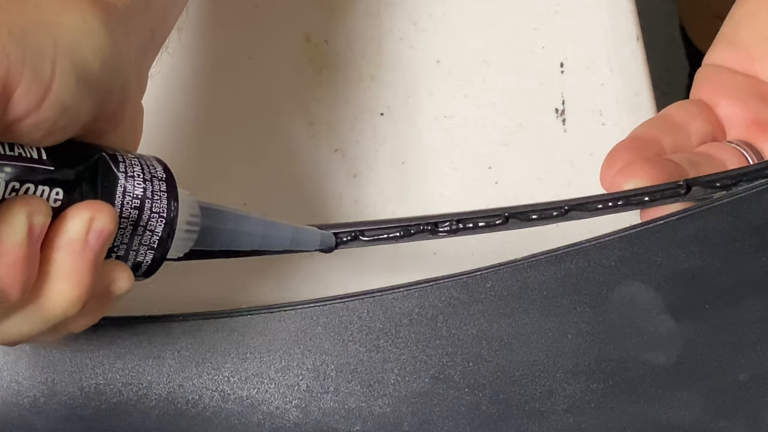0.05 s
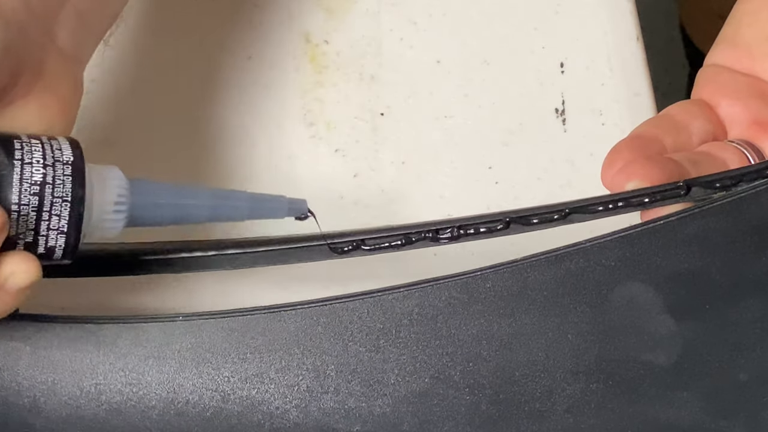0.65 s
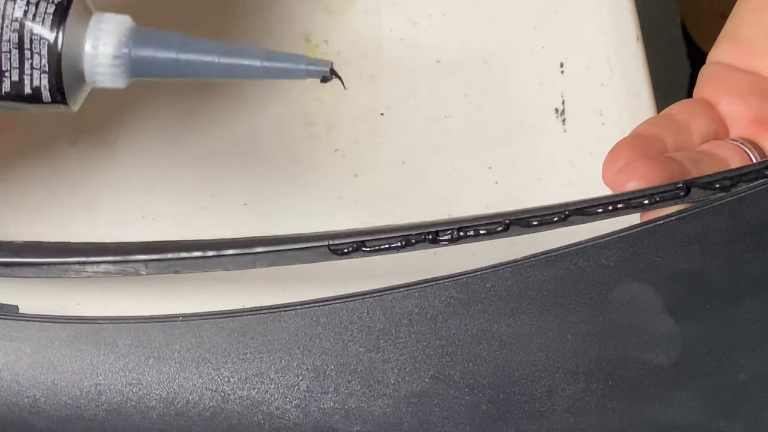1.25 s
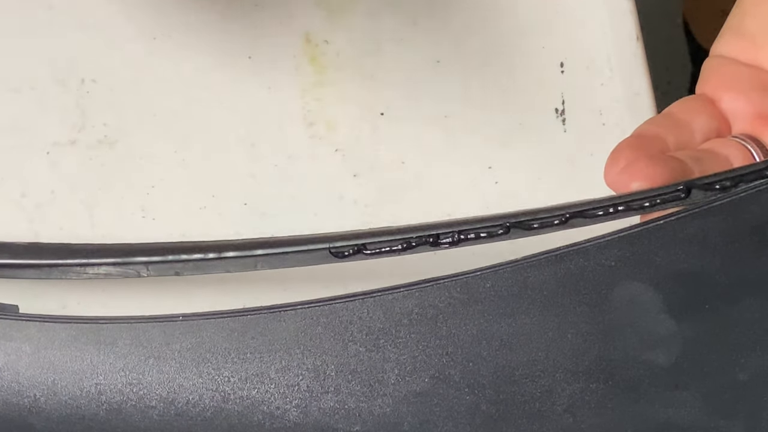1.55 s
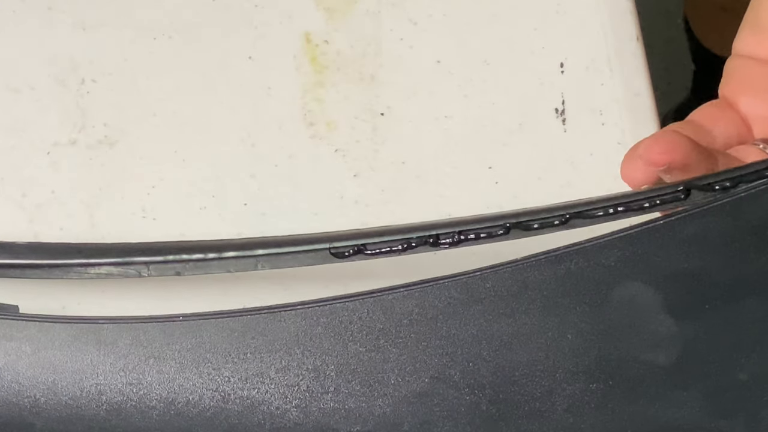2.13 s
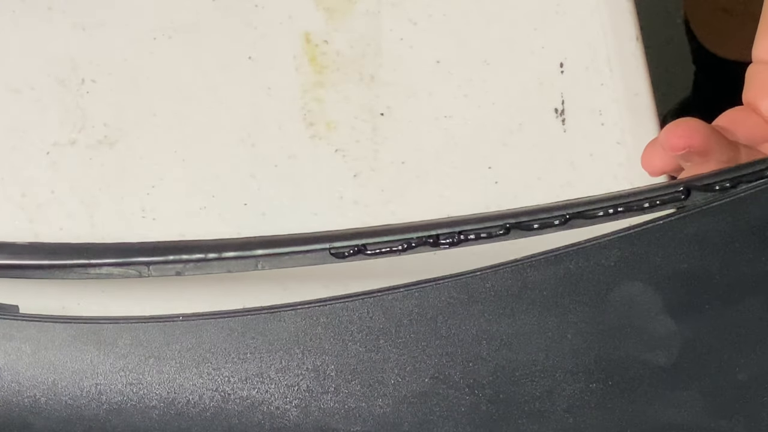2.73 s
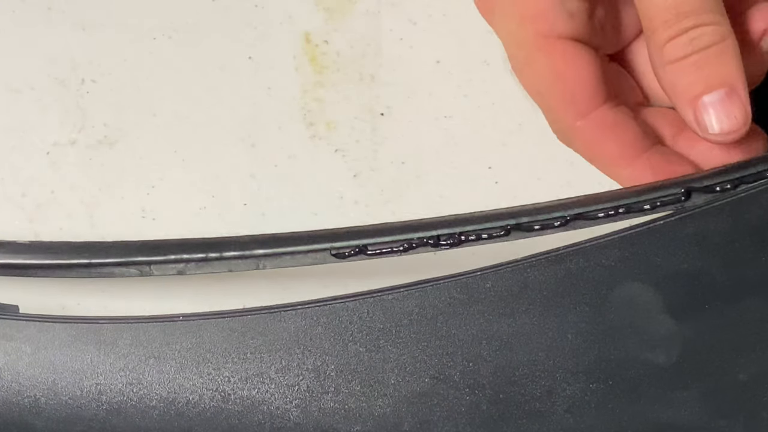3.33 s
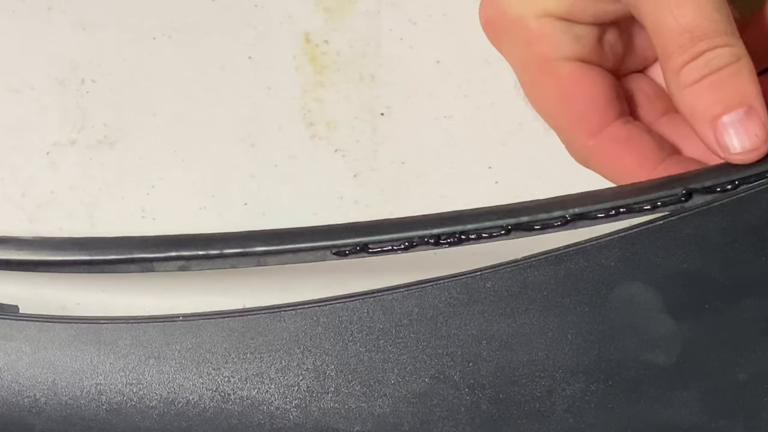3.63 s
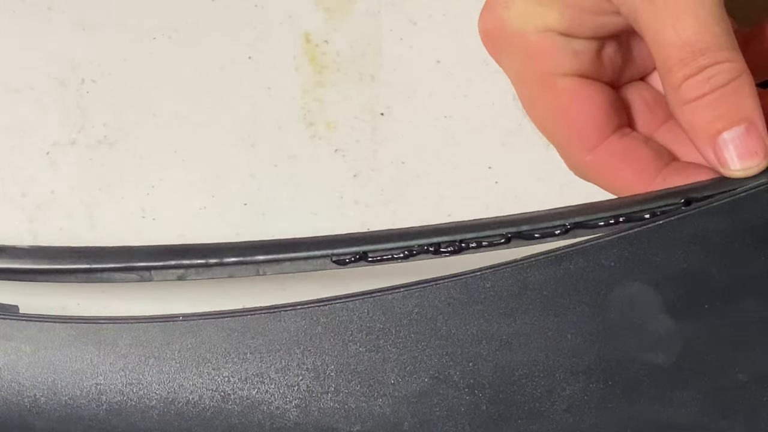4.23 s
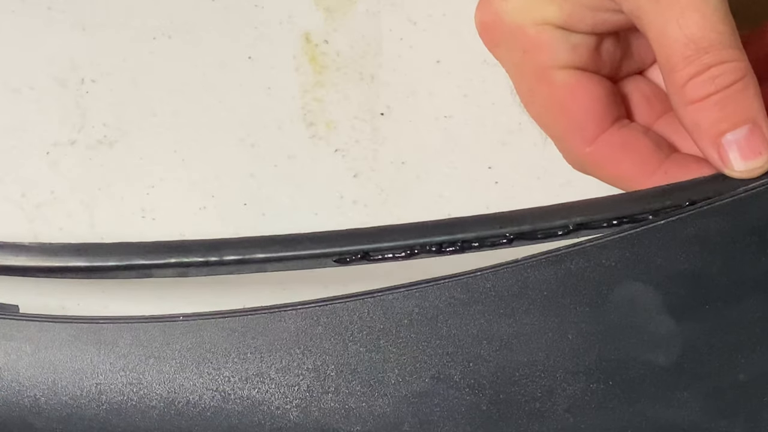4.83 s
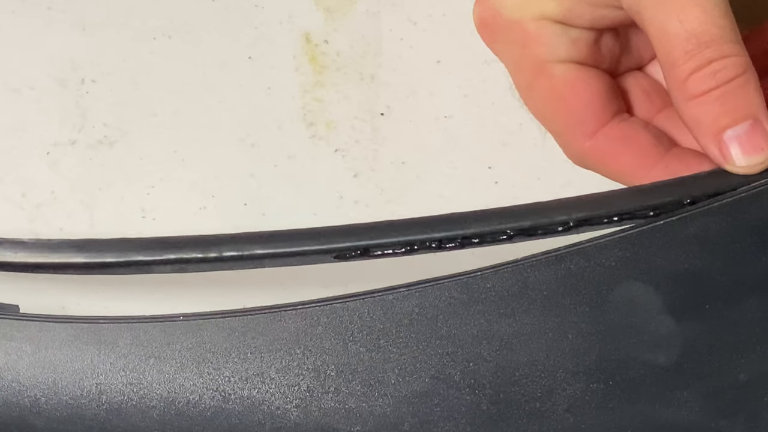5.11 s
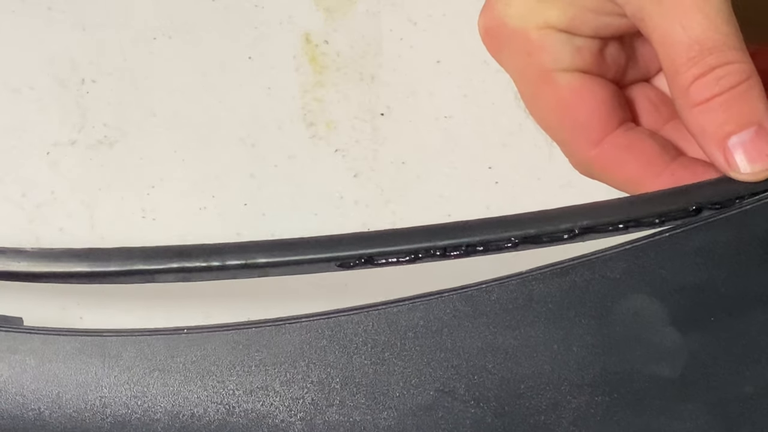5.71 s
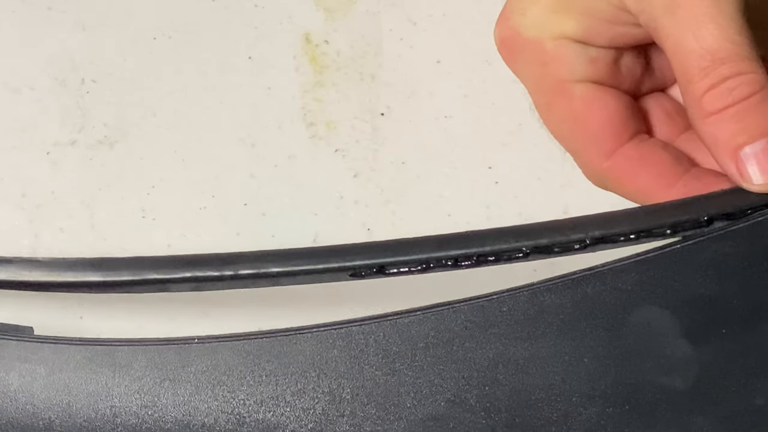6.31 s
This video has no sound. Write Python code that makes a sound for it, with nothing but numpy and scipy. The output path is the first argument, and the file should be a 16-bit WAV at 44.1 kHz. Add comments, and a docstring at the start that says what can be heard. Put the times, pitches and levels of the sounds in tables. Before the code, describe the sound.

Sharp knocks of a tube set down on a plastic table, later a short scrape and thud, with a motor humming quietly.

```python
"""A garage with a plastic work table. A tube of sealant is put down: it knocks the top into ringing,
rolls a little with its nozzle tapping and its foil skin crinkling, and drops flat. Later a plastic
trim panel scrapes over the table in tiny slips and lands with a thud. Hands brush softly over plastic.
Behind the short echo of the walls, a motor hums low and unevenly in a soft rush of air."""
import sys
import numpy as np
from scipy import signal
from scipy.fft import rfft, irfft, next_fast_len
from scipy.io import wavfile
from scipy.ndimage import uniform_filter1d

SR = 44100
rng = np.random.default_rng(int(sys.argv[2]) if len(sys.argv) > 2 else 0)


def transcribe(u):
    """Save the signal u as a 16-bit wav file named by the first command-line argument.

    u: samples, shape (n,) or (channels, n), limited to [-1, 1]; the rate is SR.
    q: integer samples, one column per channel.
    """
    v = np.clip(np.atleast_2d(u).T, -1, 1)
    q = np.round(v * 32767).astype(np.int16)
    wavfile.write(sys.argv[1], SR, q)


N = 285085
TIME = np.arange(N) / SR

# the tube rocking from crease to crease: (time [s], length [s], rumble [dB], rubbing [dB])
TUBE_ROCKS = [(2.2, 0.022, -51, -50), (2.242, 0.039, -59, -44.5), (2.314, 0.083, -40.5, -54.5),
              (2.443, 0.015, -42, -61.5)]


def tube_knocks(travel_s=.003):
    """Each blow rings the table top; where it lands weights the modes, a soft contact dulls them."""
    # (time [s], strength [dB], spot [0 middle to 1 edge], contact cut-off [Hz], clatter [dB])
    blows = [(2.1493, 0, 0.11, 6700, -29), (2.5411, -21, 0.89, 2980, -35.5), (2.5487, -3, 0.93, 2940, -30),
             (2.7700, -32.5, 0.74, 810, -47.5)]
    # table top: (pitch [Hz], t60 [s], struck in the middle [dB], struck at the edge [dB])
    table_modes = [(100, 0.073, -28, -30.5), (137.5, .13, -28, -16), (162.4, 0.15, -17.5, -31.5),
                   (249.7, 0.22, -30.5, -31), (291.1, 0.16, -46.5, -39.5), (334.7, 0.14, -26.5, -45),
                   (374, 0.14, -32.5, -25.5), (445, 0.16, -39.5, -43.5), (476, 0.057, -53.5, -40),
                   (517, 0.19, -28.5, -47), (561, 0.3, -51, -35), (628, 0.04956, -49.5, -15.5),
                   (718, .06, -36, -42), (850, 0.13, -37, -45.5), (943.4, 0.059, -44.5, -33),
                   (1222, 0.31, -45, -59), (1345, .06, -40.5, -39.5), (1531, 0.086, -38, -42.5),
                   (1712.6, 0.18, -37, -63.5), (1884, 0.16, -34.5, -58.5), (2080, .08, -32.5, -57.5),
                   (2240, .11, -42, -47), (2520, 0.15, -42, -48), (2591, .07, -42.5, -44),
                   (2754, .07, -38.5, -50), (2785, 0.0501, -36.5, -51.5)]
    hz, t60, middle_db, edge_db = np.transpose(table_modes)
    out = np.zeros(N)
    for s, strength_db, spot, contact_hz, clatter_db in blows:
        level_db = strength_db + middle_db + spot * (edge_db - middle_db)
        blow = ringing(np.c_[hz, t60, level_db], travel_s) + from_db(clatter_db) * clatter()
        add(out, s, butter(blow, contact_hz, "low"))
    return out


def panel_bumps(travel_s=0.0019, clatter_db=-38):
    """The large limp panel lands with a dull, broad thud."""
    # landings: (time [s], strength [dB], contact cut-off [Hz])
    bumps = [(5.6590, -18.5, 800), (6.0200, 0.5, 2210)]
    # trim panel: (pitch [Hz], t60 [s], level [dB])
    panel_modes = [(88.2, 0.15, -33), (120, 0.071, -49.5), (154.4, 0.33, -35.5), (216.3, 0.19, -38.5),
                   (293, 0.15, -39), (344, 0.13, -42), (435, 0.055, -37.5), (522, 0.23, -46.5),
                   (654, 0.042, -36), (862, 0.039, -41), (1266, 0.04, -42.5), (1410, 0.025, -53)]
    out = np.zeros(N)
    for s, strength_db, contact_hz in bumps:
        thud = ringing(panel_modes, travel_s) + from_db(clatter_db) * clatter()
        add(out, s, from_db(strength_db) * butter(thud, contact_hz, "low"))
    return out


def ringing(modes, travel_s, build_cycles=0.52):
    """A struck sheet: bending waves carry low notes more slowly, and these take longer to build."""
    hz, t60, level_db = np.transpose(modes)[:, :, None]
    age = np.maximum(TIME[:SR // 2] - travel_s * np.sqrt(hz[0] / hz), 0)
    build = 1 - np.exp(-age * hz / build_cycles)
    swing = np.sin(2 * np.pi * hz * age) * build * from_db(level_db - 60 * age / t60)
    return swing[::2].sum(axis=0) - swing[1::2].sum(axis=0)   # modes alternate in polarity


def clatter():
    """The crowd of weak, short-lived modes that every blow stirs."""
    # tone of the burst: (frequency [Hz], level [dB])
    spectrum = [(70, -9), (130, 8.5), (400, 11), (750, 1), (1100, -1), (2000, -5.5), (3000, -12.5),
                (3900, -13), (5500, -13), (8000, -17.5), (15000, -17.5)]
    # its decay: (frequency [Hz], t60 [s])
    decay = [(100, .13), (700, 0.12), (3000, 0.13), (12000, .07)]
    return die_away(rms_one(colour(rng.standard_normal(SR // 2), spectrum)), decay)


def nozzle_taps(snap_db=-43):
    """The tube's hard nozzle taps the table, with the same resonance each time."""
    # (time [s], level [dB])
    taps = [(2.1494, -24), (2.2465, -35), (2.2660, -41.5), (2.2782, -30), (2.323, -41.5), (2.3395, -39.5),
            (2.549, -35)]
    out = np.zeros(N)
    for s, db in taps:
        add(out, s, click(db, db + snap_db, hz=2597, t60=.013, spread=1.18, snap_hz=5500))
    return out


def rolling_tube(attack_s=0.015):
    """The creased tube drums softly on the table as it rolls, and its skin rubs."""
    # drumming resonances: (pitch [Hz], bandwidth [Hz], level [dB])
    roll_modes = [(222.8, 30, 0), (260, 18, -6), (339, 40, -12), (422, 54, -15)]
    # tone of the rubbing: (frequency [Hz], level [dB])
    rub_spectrum = [(200, -12), (550, 2.5), (850, 0.5), (1250, 5.5), (1700, 2), (2300, 0), (3300, -10),
                    (4500, -12.5), (8000, -29), (15000, -51)]
    s, length_s, rumble_db, rubbing_db = np.transpose(TUBE_ROCKS)
    rumble = strokes(zip(s, length_s, rumble_db), attack_s, t60=0.17)
    rubbing = strokes(zip(s, length_s, rubbing_db), attack_s, t60=0.1)
    jolts = slips(per_s=600, spread_db=3.5)
    drum = sum(from_db(db) * signal.lfilter(*signal.iirpeak(hz, hz / width, fs=SR), jolts)
               for hz, width, db in roll_modes)
    rub = colour(slips(per_s=3400, spread_db=8.0), rub_spectrum)
    return rumble * steadied(butter(drum, [190, 520], "band")) + rubbing * steadied(rub)


def foil_crinkle(below_rumble_db=38.5):
    """The tube's creased foil crackles finely as it settles, and faintly while it rocks."""
    # after each landing: (time [s], length [s], level [dB])
    settling = [(2.15, 0.087, -62), (2.538, 0.038, -62.5)]
    # tone of the foil: (frequency [Hz], level [dB])
    spectrum = [(2000, -25), (3500, -5), (4800, -5), (7000, -5.5), (10000, -15), (14000, -24.5)]
    rocking = [(s, length_s, rumble_db - below_rumble_db) for s, length_s, rumble_db, _ in TUBE_ROCKS]
    flexing = strokes(settling + rocking, attack_s=0.014, t60=0.22)
    return flexing * steadied(colour(slips(per_s=6000, spread_db=3.0), spectrum))


def sliding_panel(start_s=5.904, peak_s=5.976, end_s=6.02, peak_db=-47):
    """One shove: the panel's edge sticks and slips, swelling to the hardest push, then easing off."""
    # tone of the scrape: (frequency [Hz], level [dB])
    spectrum = [(90, 10.5), (160, 5), (350, 9), (600, 0.5), (1000, -1.5), (2100, -2), (4000, -16),
                (7000, -25.5), (10500, -26), (15000, -46)]
    grow_db_per_s, ease_db_per_s = 141, 168
    past_peak = TIME - peak_s
    push_db = peak_db + np.minimum(grow_db_per_s * past_peak, -ease_db_per_s * past_peak)
    push = from_db(push_db) * stroke(start_s, end_s - start_s, attack_s=0.0066, t60=0.043)
    return push * steadied(colour(slips(per_s=2200, spread_db=4.0), spectrum))


def edge_ticks():
    """Edges of tube and trim catch and let go with light ticks."""
    # (time [s], body [dB], bright snap [dB])
    catches = [(2.537, -52, -64), (2.558, -59, -58), (2.579, -48.5, -66), (3.420, -97, -86),
               (3.501, -78.5, -66.5), (3.519, -87, -74), (5.9065, -68.5, -70.5), (5.928, -45, -55.5),
               (5.9500, -49, -79), (5.964, -47, -51), (5.974, -61, -49.5), (5.983, -53, -69),
               (6.021, -50.5, -65), (6.095, -70, -67.5)]
    out = np.zeros(N)
    for s, body_db, snap_db in catches:
        add(out, s, click(body_db, snap_db, hz=3280, t60=0.023, spread=1.43, snap_hz=6500))
    return out


def click(body_db, snap_db, hz, t60, spread, snap_hz, snap_t60=0.028):
    """A hard plastic touch: one broad, quickly damped resonance and a bright snap."""
    t = TIME[:SR // 8]
    body_noise, snap_noise = rng.standard_normal((2, len(t)))
    fade = from_db(body_db - 60 * t / t60)
    body = butter(body_noise * fade, [hz / spread, hz * spread], "band", order=3)
    snap = rms_one(butter(snap_noise, snap_hz, "high")) * from_db(snap_db - 60 * t / snap_t60)
    return rms_one(body) * np.sqrt(np.mean(fade ** 2)) + snap


def hands():
    """Skin brushes softly over tube and trim."""
    # (time [s], length [s], level [dB])
    brushes = [(.91, 0.076, -74), (1.22, 0.34, -82.5), (3.36, 0.23, -81), (3.7, 0.26, -79.5)]
    # tone of skin on plastic: (frequency [Hz], level [dB])
    spectrum = [(200, -15.5), (500, 7), (900, 3.5), (1500, -10.5), (2500, -16.5), (5000, -22), (14000, -34)]
    touch = strokes(brushes, attack_s=0.038, t60=.55)
    return touch * rms_one(colour(slips(per_s=6000, spread_db=2.0), spectrum))


def motor_hum(hum_hz=56.6, hum_db=-59.5, flutter_depth=.2, flutter_hz=11):
    """The motor's main tone throbs in slow beats and flutters, above two faint steady tones."""
    # overlapping throbs: (rate [Hz], depth [0-1], time of a swell [s])
    beats = [(1.79, .28, 3.35), (1.56, .26, 3.34), (2.25, .22, 2.83), (2.56, .17, 1.09)]
    # steady undertones: (pitch [Hz], level [dB])
    low_tones = [(47.3, -81), (29, -87)]
    throb = 1 + sum(depth * np.cos(2 * np.pi * rate * (TIME - s)) for rate, depth, s in beats)
    flutter = flutter_depth * rms_one(butter(rng.standard_normal(N), flutter_hz, "low"))
    main = from_db(hum_db) * (throb + flutter) * np.sin(2 * np.pi * (hum_hz * TIME + rng.random()))
    low = sum(from_db(db) * np.sin(2 * np.pi * (hz * TIME + rng.random())) for hz, db in low_tones)
    return np.sqrt(2) * (main + low)


def air(level_db=-61.5, low_cut_hz=46):
    """A steady bed of moving air."""
    # tone of the rush: (frequency [Hz], level [dB])
    spectrum = [(45, -14), (70, -6.5), (118, -5.5), (181, -13.5), (237, -16), (350, -22.5), (490, -26.5),
                (840, -29), (1450, -39.5), (3500, -53.5), (5800, -54.5), (7000, -50.5), (8400, -62.5),
                (10300, -56), (12500, -72.5), (15500, -69)]
    noise = colour(diffuse(next_fast_len(N, True))[:, :N], spectrum)
    return from_db(level_db) * rms_one(butter(noise, low_cut_hz, "high"))


def direct_sound(x, lean_db=0.87, treble_hz=8000, lag_samples=13):
    """The table's bass leans left; the top treble reaches the left side slightly late."""
    bass = butter(x, 700, "low", order=1)
    treble = colour(x, [(treble_hz / 2, -120), (treble_hz, 0)])
    leaning = x + bass * (from_db([[lean_db], [-lean_db]]) - 1)
    return leaning + (np.roll(treble, lag_samples) - treble) * [[1], [0]]


def side_echo(x, level_db=-5, band_hz=(850, 1500), lag_samples=110):
    """A close surface at one side returns the mids to left and right in opposite phase."""
    mids = butter(x, band_hz, "band", order=3)
    return from_db(level_db) * np.roll(mids, lag_samples) * [[1], [-1]]


def garage_echo(x, tail_db=-11, early_db=-11, early_t60=.09, build_s=0.0045):
    """Small near surfaces return the treble at once; the walls add a longer tail."""
    # tone of the tail: (frequency [Hz], level [dB])
    spectrum = [(100, -8), (250, 1), (600, -3), (1300, 1), (3000, 0), (7000, 0), (15000, -9)]
    # reverb time: (frequency [Hz], t60 [s])
    decay = [(100, 0.77), (500, 0.41), (2000, 0.51), (5000, 0.22), (14000, 0.22)]
    t = TIME[:SR * 3 // 4]
    tail = die_away(colour(diffuse(len(t)), spectrum), decay) * (1 - np.exp(-t / build_s))
    early = butter(diffuse(len(t)), 740, "high") * from_db(-60 * t / early_t60)
    response = (from_db(tail_db) * rms_one(tail) + from_db(early_db) * rms_one(early)) / np.sqrt(len(t))
    return signal.fftconvolve(x[None], response, axes=1)[:, :N]


def diffuse(size):
    """White stereo noise, nearly mono in the bass and wider above."""
    # stereo image: (frequency [Hz], left-right correlation [-1 to 1])
    likeness = [(60, 0.93), (130, 0.96), (300, 0.84), (700, .45), (1300, .3), (2500, 0.68), (4400, .85),
                (8000, 0.54), (14000, -.1)]
    alike = at_hz(likeness, np.fft.rfftfreq(size, 1 / SR))
    mid, side = rfft(rng.standard_normal((2, size)))
    return irfft(np.sqrt((1 + alike) / 2) * mid + np.sqrt((1 - alike) / 2) * side * [[1], [-1]], size)


def slips(per_s, spread_db):
    """Friction: tiny slips of uneven size at random moments."""
    sizes = from_db(spread_db * np.minimum(rng.exponential(1, N), 3)) * rng.choice([-1, 1], N)
    return sizes * (rng.random(N) < per_s / SR)


def stroke(start_s, length_s, attack_s, t60):
    """Envelope of one movement: it rises, holds and dies away."""
    age = TIME - start_s
    return np.clip(age / attack_s, 0, 1) * from_db(-60 * np.clip(age - length_s, 0, 3 * t60) / t60)


def strokes(rows, attack_s, t60):
    """Envelope of several movements: (time [s], length [s], level [dB])."""
    return sum(from_db(db) * stroke(s, length_s, attack_s, t60) for s, length_s, db in rows)


def die_away(noise, t60s, bands=12):
    """Let each band of a noise fade at its own rate."""
    size = noise.shape[-1]
    centres = np.geomspace(80, 16000, bands)
    spectrum, hz = rfft(noise), np.fft.rfftfreq(size, 1 / SR)
    out = np.zeros_like(noise)
    for centre, share in zip(centres, np.eye(bands)):
        band = irfft(spectrum * at_hz(np.c_[centres, share], hz), size)
        out += band * from_db(-60 * TIME[:size] / at_hz(t60s, centre))
    return out


def colour(x, curve):
    """EQ a sound with a curve: (frequency [Hz], gain [dB])."""
    size = next_fast_len(x.shape[-1])
    gain = from_db(at_hz(curve, np.fft.rfftfreq(size, 1 / SR)))
    return irfft(rfft(x, size) * gain, size)[..., :x.shape[-1]]


def butter(x, hz, kind, order=2):
    """Causal Butterworth filter."""
    return signal.sosfilt(signal.butter(order, hz, kind, fs=SR, output="sos"), x)


def at_hz(points, hz):
    """Read a table on a log-frequency axis."""
    points = np.array(points)
    return np.interp(np.log(np.maximum(hz, 1)), np.log(points[:, 0]), points[:, 1])


def steadied(x, window=900):
    """Even out the level of a noise from moment to moment."""
    return x / np.sqrt(np.abs(uniform_filter1d(x ** 2, window)) + 1e-20)


def rms_one(x):
    """The same sound at rms 1."""
    return x / np.sqrt(np.mean(x ** 2) + 1e-20)


def from_db(db):
    """Gain of a level in dB."""
    return 10 ** (np.asarray(db) / 20)


def add(out, s, sound):
    """Mix a sound in at a moment."""
    start = round(s * SR)
    out[start:start + len(sound)] += sound[:N - start]


def scene(low_cut_hz=62):
    """Handling sounds on the table and their echo, over a bed of motor and air."""
    tube = tube_knocks() + nozzle_taps() + rolling_tube() + foil_crinkle()
    handling = tube + edge_ticks() + sliding_panel() + panel_bumps() + hands()
    handling = butter(handling, low_cut_hz, "high")   # thin sheets radiate no deep bass
    foreground = direct_sound(handling) + side_echo(handling) + garage_echo(handling)
    bed = (motor_hum() + air()) * from_db([[.2], [-.2]])   # a touch to the left
    return foreground + bed


def record(dry, cutoff_hz=15700):
    """A steep low-pass takes off the very top."""
    return signal.sosfilt(signal.ellip(10, .1, 80, cutoff_hz, fs=SR, output="sos"), dry)


dry = scene()
out = record(dry)
transcribe(out)
```